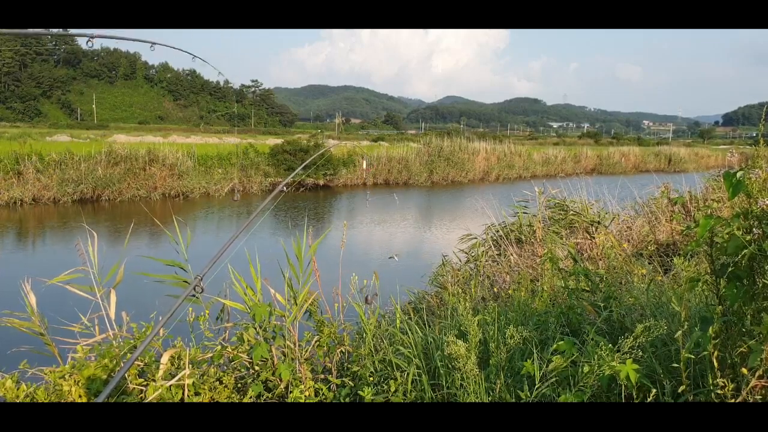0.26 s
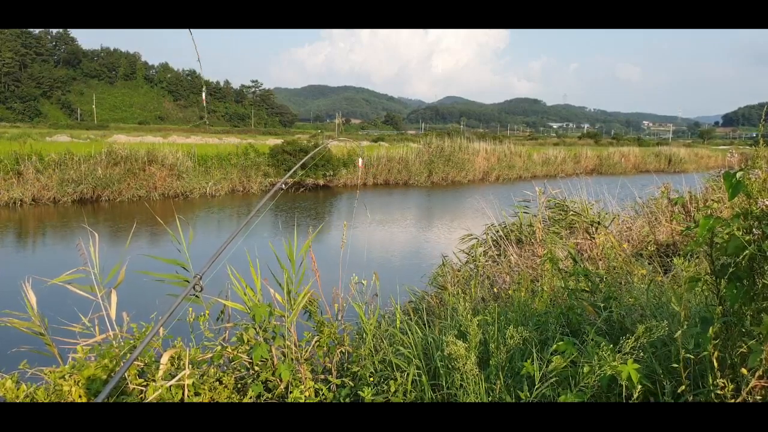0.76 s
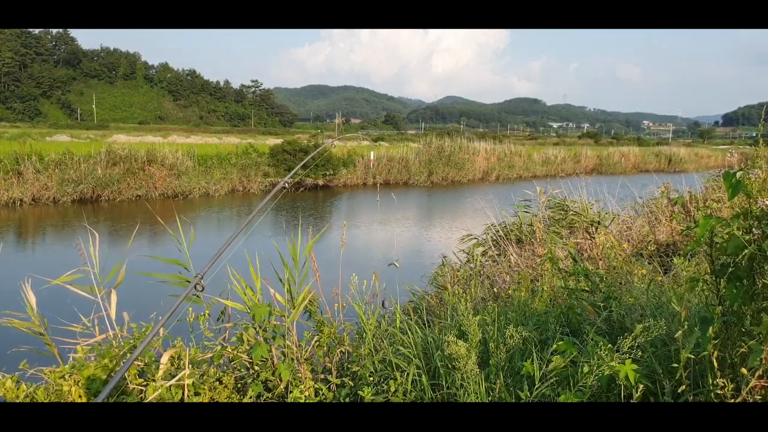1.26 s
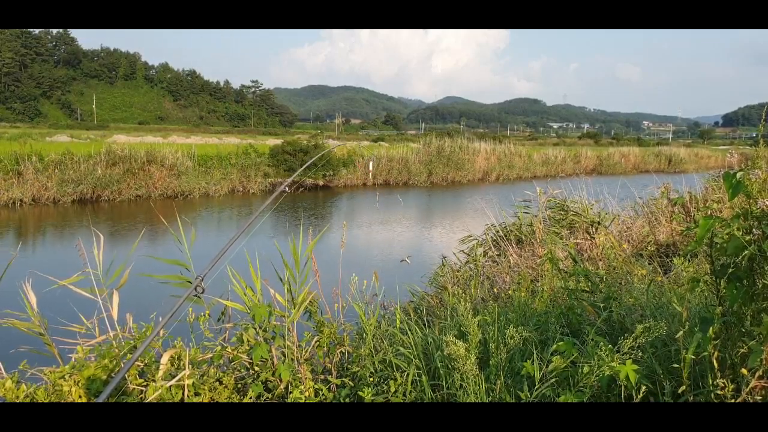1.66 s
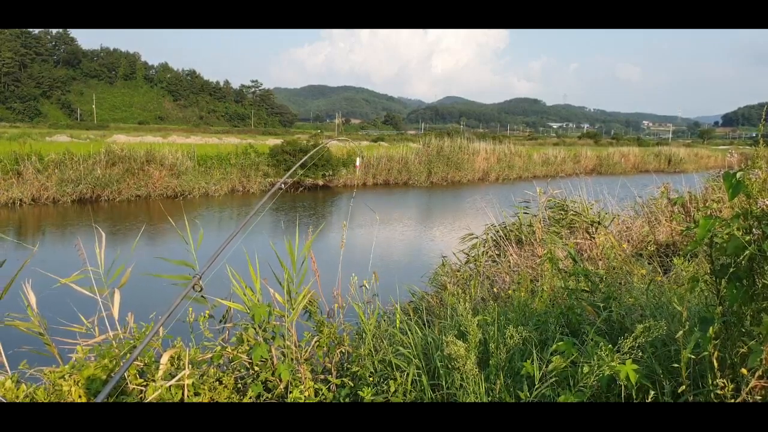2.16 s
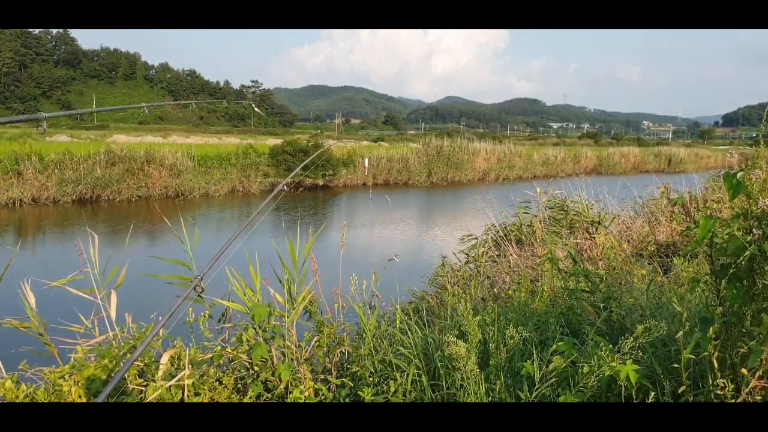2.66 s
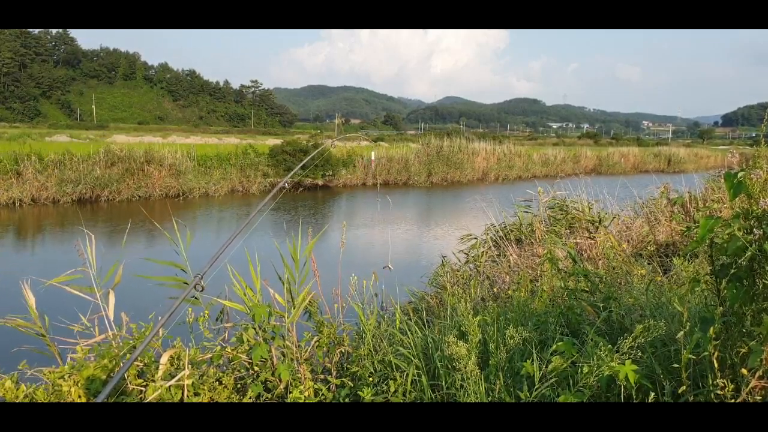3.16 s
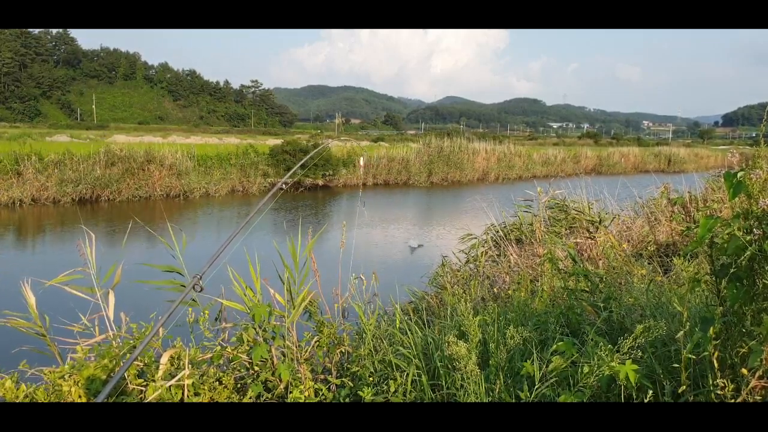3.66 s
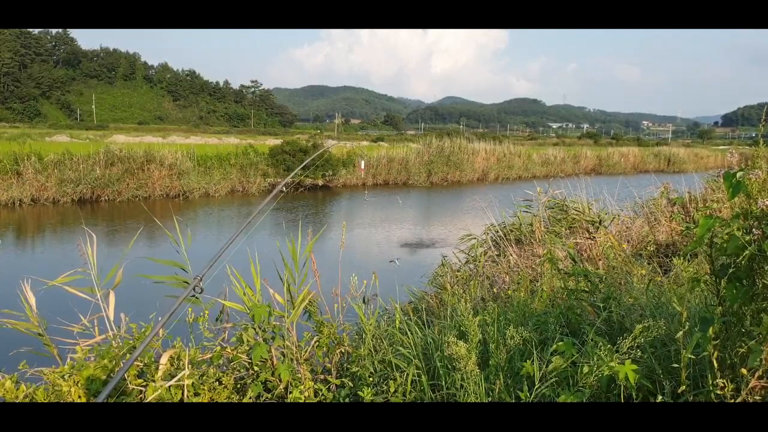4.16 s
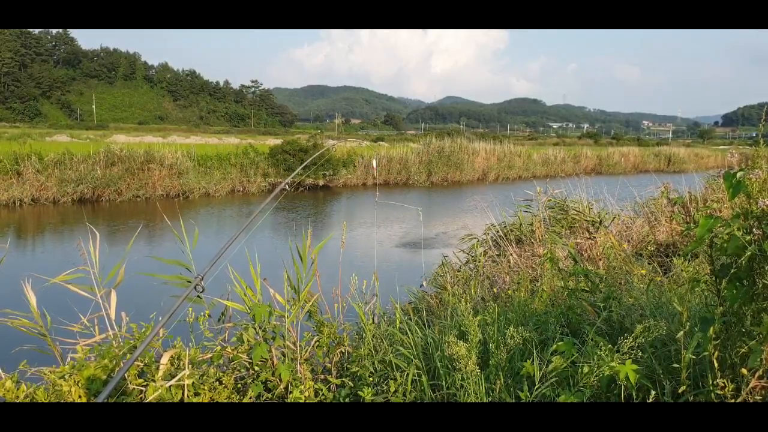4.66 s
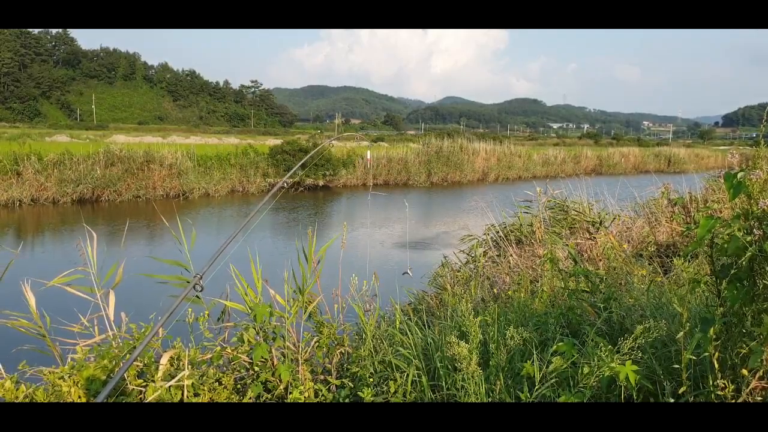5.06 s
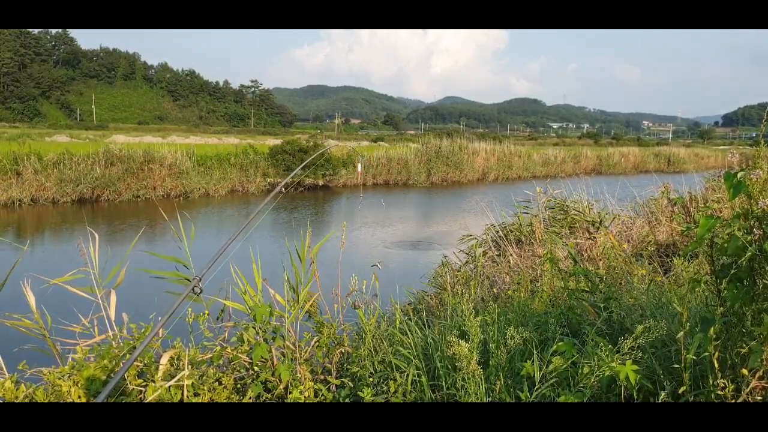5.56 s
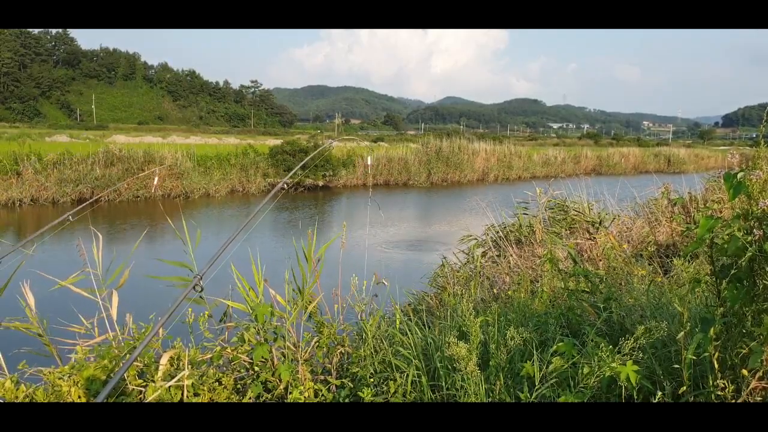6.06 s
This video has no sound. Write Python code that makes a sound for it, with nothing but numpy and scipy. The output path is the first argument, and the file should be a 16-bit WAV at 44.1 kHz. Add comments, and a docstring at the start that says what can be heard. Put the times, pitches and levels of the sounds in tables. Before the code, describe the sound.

Gusty wind rumbles on the microphone while a fishing cast whips line off a reel in rapid cracks, with insects rasping over a reedy bank.

```python
"""A reedy bank in gusty wind, heard through the two microphone ports of a phone.
Close on the left an angler casts: line whips off the spool in quick cracks over a crackling hiss.
Hands, cloth and stems rustle before and after as noise that rings the tackle; bubbles plop at the lure.
A katydid and a trilling cricket beat out rasps and tooth clicks; crickets on the right slide short notes.
Wind is uneven rumble and flutter with swinging buffets and pressure jolts; far leaves hiss behind."""
import sys
import numpy as np
from scipy import signal
from scipy.fft import rfft, irfft
from scipy.io import wavfile
from scipy.ndimage import uniform_filter1d, map_coordinates

SR = 44100
rng = np.random.default_rng(int(sys.argv[2]) if len(sys.argv) > 2 else 0)


def store_wav(level_fs):
    """Save 16-bit WAV to argv[1]."""
    pcm = np.round(np.clip(np.atleast_2d(level_fs), -1, 1) * 32767)
    wavfile.write(sys.argv[1], SR, pcm.T.astype(np.int16))


N = 278271
PORT_LAG = 19  # samples by which the right port hears the left bank later


def amp(db):
    """Decibels to a plain factor."""
    return 10 ** (np.asarray(db, float) / 20)


def pan(db):
    """Factors for the two ports, from left minus right in dB."""
    return amp([[db / 2], [-db / 2]])


def add(out, s, sound):
    """Lays a short sound into the mix at s seconds."""
    i = max(int(s * SR), 0)
    out[:, i:i + sound.shape[1]] += sound[:, :N - i]


def unit_rms(x):
    """Scales both ports together to rms 1."""
    return x / np.sqrt(np.mean(x ** 2))


def butter(x, hz, kind="low"):
    """Gentle second-order filter."""
    return signal.sosfilt(signal.butter(2, hz, kind, fs=SR, output="sos"), x)


def steep_cut(x, hz, depth_db):
    """Steep low-pass that takes the treble above hz down by depth_db or more."""
    return signal.sosfilt(signal.ellip(8, .2, depth_db, hz, fs=SR, output="sos"), x)


def colour(x, points, size=8192):
    """Causal filter through (Hz, dB) points, made from the cepstrum of the log gain; each port has rms 1."""
    hz, db = np.transpose(points)
    bins_hz = np.arange(size // 2 + 1) * SR / size
    log_gain = np.interp(np.log(bins_hz + 1), np.log(hz), db) * np.log(10) / 20
    cepstrum = irfft(log_gain)
    # folding the cepstrum forward gives minimum phase
    cepstrum[1:size // 2] *= 2
    cepstrum[size // 2 + 1:] = 0
    impulse = irfft(np.exp(rfft(cepstrum)))
    y = signal.oaconvolve(x, impulse[None], axes=1)[:, :x.shape[1]]
    return y / np.sqrt(np.mean(y ** 2, axis=1, keepdims=True))


def curve(rows, off=None):
    """Columns of a table at every sample; off is the value outside its times."""
    s, *columns = np.transpose(rows)
    return [np.interp(np.arange(N) / SR, s, c, off, off) for c in columns]


def walk(rate, channels=1):
    """Random levels held 1 / rate seconds and slewed twice."""
    k = int(SR / rate)
    held = np.repeat(rng.standard_normal((channels, N // k + 1)), k, axis=1)[:, :N]
    return 0.98 * uniform_filter1d(uniform_filter1d(held, k), k)


def ports(likeness, grain_db=0.):
    """Noise of random grain sizes at both ports: partly the same, later on the right."""
    grains = amp(grain_db * np.minimum(rng.exponential(size=N), 5.0))
    left, other = rng.standard_normal((2, N)) * grains
    right = likeness * left + np.sqrt(1 - likeness ** 2) * other
    return np.array([left, np.roll(right, PORT_LAG)])


def resonate(x, hz, width):
    """One resonance peak."""
    return signal.lfilter(*signal.iirpeak(hz, hz / width, fs=SR), x)


def ring(x, modes, patchy_db=0., rate=25.):
    """Noise through (Hz, width Hz, dB) resonances, each coming and going on its own; result has rms 1."""
    y = 0
    for hz, width, db in modes:
        level_db = db + (patchy_db * walk(rate) if patchy_db else 0)
        y = y + amp(level_db) * resonate(x, hz, width)
    return unit_rms(y)


def waver(x, share, rate):
    """Plays a sound a little faster and slower by turns, so that its resonances drift."""
    place = np.cumsum(1 + np.clip(share * walk(rate)[0], -.3, .3))
    return np.array([map_coordinates(v, [place], mode="mirror") for v in x])


def even(x, seconds):
    """Levels out the slow swells of a noise and keeps the quick ones."""
    k = int(seconds * SR)
    return x / np.sqrt(uniform_filter1d(uniform_filter1d(x ** 2, k), k) + 1e-9)


def crackle(rate, t60, spread_db, bed_db):
    """Gate of chance catches that start at once and die away over a steady bed; rms 1."""
    hit = rng.random(N) < rate / SR
    size = amp(spread_db * np.minimum(rng.exponential(size=N), 4.0))
    catches = signal.lfilter([1], [1, -amp(-60 / (t60 * SR))], hit * size)
    return unit_rms(amp(bed_db) + catches)


def swell(s, db, rise, fall):
    """A peak that grows 20 dB in rise s and fades 20 dB in fall s."""
    t = np.arange(N) / SR
    return amp(db - 20 * np.maximum((s - t) / rise, (t - s) / fall))


def burst(noise, s, t60, tail_db, rise=0.00079):
    """A stretch of noise under a quick rise, a fast fall and a faint tail, peak 1 at each port."""
    t = np.arange(4000) / SR
    i = int(s * SR / 2)  # each moment takes its own stretch
    fall = amp(-60 * t / t60) + amp(tail_db - 60 * t / (20.0 * t60))
    shape = (1 - np.exp(-t / rise)) * fall
    y = noise[:, i:i + len(t)] * np.array([shape, np.roll(shape, PORT_LAG)])
    return y / np.abs(y).max(axis=1, keepdims=True)


def slides(rows, pan_db):
    """Short near-pure notes that slide in pitch."""
    out = np.zeros((2, N))
    for s, hz0, hz1, length, db in rows:
        n = int(length * SR)
        turns = np.cumsum(np.linspace(hz0, hz1, n)) / SR
        add(out, s, amp(db) * np.hanning(n) * np.sin(2 * np.pi * turns) * pan(pan_db))
    return out


# Hiss of far leaves and reeds. Each row: frequency in Hz, gain in dB.
LEAF_TONE = [(88, -34), (150, -17), (354, -12.5), (689, -26.5), (1260, -22.5), (2310, -20.5), (3220, -19),
             (3900, -10.5), (5680, -9), (7600, -12), (9100, -15), (12400, -10.5), (14000, -17),
             (15400, -16), (16000, -13.5)]
# How loud the leaves are. Each row: time in seconds, level in dB.
LEAF_LEVEL = [(0, -51.5), (.45, -58), (.7, -59), (1.3, -55.5), (2.0, -56), (3.8, -60.5), (4.5, -61.5),
              (5.3, -60.5), (6.31, -53)]


def far_leaves():
    """Distant hiss whose low, middle and high parts waver on their own."""
    hiss = colour(ports(0.11), LEAF_TONE)
    low, high = butter(hiss, 3500), butter(hiss, 9000, "high")
    out = np.zeros((2, N))
    for part in (low, hiss - low - high, high):
        out += amp(2.0 * walk(8.1) + 0.61 * walk(10.0, channels=2)) * part
    return amp(curve(LEAF_LEVEL)[0]) * out


# Low hollow hiss. Each row: time in seconds, relative level in dB.
HOLLOW_LEVEL = [(4.75, -76), (5.106, -58), (5.75, -88)]
# Its resonances. Each row: frequency in Hz, width in Hz, relative level in dB.
HOLLOW_MODES = [(1610, 210, 3), (2400, 820, -3.5)]


def hollow_hiss():
    """Noise through two drifting resonances swells and sinks, crackling a little."""
    hollow = waver(ring(ports(0.94), HOLLOW_MODES, patchy_db=3.0), .06, 10.)
    return amp(curve(HOLLOW_LEVEL, -120.)[0] + 5.0) * crackle(400., 0.022, 2.1, -6.0) * hollow


# Crickets on the right. Each row: a note as start in Hz, end in Hz, length in seconds, seconds between
# notes; then its phrases, each with first note in seconds, end in seconds, level in dB.
CHIRPS = [((4750, 4150, 0.0214, .034), [(0, .05, -54.5), (.265, .38, -52), (3.675, 3.76, -58),
          (4.078, 4.09, -57), (6.013, 6.1, -54)]), ((4180, 3850, 0.022, .061), [(.688, .96, -68.5)]),
          ((6140, 5340, 0.0074, 0.014), [(.558, .576, -56), (.657, .675, -60), (.753, .771, -62.5),
          (3.893, 3.91, -60), (4.168, 4.186, -63), (4.26, 4.278, -60)]), ((5470, 5060, 0.011, 0.015),
          [(.28, .31, -45), (1.209, 1.25, -50), (1.259, 1.285, -58), (5.757, 5.8, -61)])]


def crickets(rasp_db=3.0, scatter_db=1.5):
    """Every cricket repeats its own sliding, slightly raspy note through each phrase."""
    notes = []
    for (hz0, hz1, length, every), phrases in CHIRPS:
        for first, end, db in phrases:
            for s in np.arange(first, end, every):
                notes.append((s, hz0, hz1, length, db + scatter_db * rng.standard_normal()))
    return amp(rasp_db * walk(900)) * slides(notes, pan_db=-20.5)


# Two trills. Each row of a trill: time in seconds, relative level in dB, wing strokes per second.
TRILLS = [
    [(1.15, -67, 70), (1.4, -56.5, 71), (1.718, -54.5, 77), (1.935, -55.5, 72)],
    [(5.6, -67, 70.0), (5.75, -61, 70.0), (5.8, -57, 70.0), (6.01, -53, 72), (6.31, -56, 64)],
]
# The ringing wing. Each row: frequency in Hz, width in Hz, relative level in dB, left minus right in dB.
WING_MODES = [(4440, 580, -2.5, 1), (9900, 2000, -8, 8), (14700, 1300, -7.5, 14)]


def trilling_cricket(teeth=(0, .00064, .00128, .00213), scatter_db=1.5, rasp_db=15):
    """Every stroke drags a few teeth (delays in s) over the wing, which rings at a pitch and its overtones."""
    clicks = np.zeros(N)
    for rows in TRILLS:
        rate = curve(rows)[1] * (1 + 0.02 * walk(60)[0])
        strokes = np.diff(np.cumsum(rate / SR) // 1, prepend=0)
        level_db = curve(rows, -120.)[0] + 35.5
        for lag in teeth:
            clicks += np.roll(strokes, int(lag * SR)) * amp(level_db + scatter_db * rng.standard_normal(N))
    # the wing also rasps for a moment at every stroke
    clicks += amp(rasp_db) * uniform_filter1d(clicks, 220) * rng.standard_normal(N)
    wing = np.zeros((2, N))
    for hz, width, db, pan_db in WING_MODES:
        tone = resonate(resonate(clicks, hz, 2 * width), hz, width)
        wing += amp(db - 3.0) * pan(pan_db) * tone
    return np.array([wing[0], np.roll(wing[1], PORT_LAG)])


# Bouts of evenly spaced katydid phrases. Each row: first phrase in seconds, end in seconds,
# seconds between phrases, level in dB at first, level in dB at the end.
KATYDID_BOUTS = [(.04, 2.2, .2075, -47, -47), (3.807, 5.7, .2035, -53, -51), (5.844, 6.4, .2235, -48, -47)]
# Rasp of the wing. Each row: frequency in Hz, gain in dB.
KATYDID_TONE = [(8500, -40), (10300, 1), (11500, 2), (12600, 11.5), (13600, 0), (15200, -1), (16000, -48)]


def katydid(gap=0.0157, stroke=0.0054, growth_db=1.5, scatter_db=3.0, pan_db=9.5, count=5):
    """Each wing stroke on the left is a short rasp; five strokes, tending to grow, make a phrase."""
    gate, t = np.zeros(N), np.arange(N) / SR
    for first, end, every, db0, db1 in KATYDID_BOUTS:
        for s in np.arange(first, end, every):
            near = slice(max(int((s - .12) * SR), 0), int((s + .03) * SR))
            phrase_db = np.interp(s, [first, end], [db0, db1])
            for k in range(count):  # counted back from the last stroke; they tend to grow toward it
                db = phrase_db - growth_db * k + scatter_db * rng.standard_normal()
                gate[near] += amp(db) * np.exp(-.5 * ((t[near] - s + gap * k) / stroke) ** 2)
    return gate * amp([[0], [-pan_db]]) * colour(ports(0.17), KATYDID_TONE)


# Single buffets that stand out. Each row: time in seconds, relative level in dB,
# left minus right in dB, flutter against rumble in dB.
BUFFETS = [(0.124, -31.5, -1, -16), (0.428, -54, 17.5, -31), (0.51, -40.5, -28, -25),
           (0.632, -36.5, 17, -9.5), (0.747, -37.5, 21, -28), (0.854, -26.5, -14, -10.5),
           (1.076, -33, 14, -17), (1.308, -46, 15, -35), (1.39, -29.5, 32, -3), (1.519, -37, 0, -20),
           (1.612, -31.5, 28, -17), (1.683, -32, -3, -11), (1.792, -28, 4, -10.5), (1.955, -35.5, 0.5, -19),
           (2.166, -27, 17, -9), (2.301, -28.5, 31, -11), (2.399, -31.5, 23, -6), (2.544, -36, 29, -26),
           (2.807, -34.5, 3.5, -11), (2.887, -34, -7, -9.5), (2.972, -27.5, 37, -1.5),
           (3.113, -23, 31, -12), (3.233, -23.5, 23, -10), (3.424, -34.5, 26, -8.5),
           (3.477, -31.5, 20, -19), (3.651, -38, 20, -25), (4.023, -36, 27, -12.5), (4.355, -35, -9, -16),
           (4.405, -25, 33, -10.5), (4.496, -25.5, 22, -13), (4.721, -38.5, 19, -27), (4.86, -36.5, 43, 3),
           (4.962, -37.5, -25, -12), (5.016, -37, -19, -25), (5.126, -32.5, 24.5, -20),
           (5.201, -31.5, 22, -18), (5.348, -27, 17, -10), (5.571, -37.5, 10, -35), (5.61, -26, 7, -19),
           (5.645, -23.5, 23, -8), (5.723, -28.5, -1, 0), (5.745, -23, 3, -8), (5.785, -26, 7, -1.5),
           (5.837, -26.5, -26, -15), (5.885, -31, 2, -9), (5.921, -28, 3, -6), (5.953, -24, -19, -25),
           (6.018, -26, 3.5, -12), (6.066, -17, 14, -8.5), (6.15, -25, 11, 1.5), (6.191, -20, 13, -1.5),
           (6.265, -20, -1, -10)]
BUFFET_RISE_S, BUFFET_FALL_S = 0.013, 0.019
# centre pitch of a buffet's swing and of its sharp front; both scatter and sink by the sag share
BUFFET_HZ, FLAP_HZ, BUFFET_SAG = 61.8, 125.8, 0.28


def buffets():
    """Each buffet swings a few times, sinking; also returns the flutter it stirs up at the ports."""
    t, thumps, stirred = np.arange(N) / SR, np.zeros((2, N)), np.zeros((2, N))
    for s, db, pan_db, flap_db in BUFFETS:
        pitch, phase = rng.random(), rng.random((2, 1))  # each port swings on its own
        near = slice(max(int((s - .2) * SR), 0), int((s + .3) * SR))
        since = t[near] - s
        shape = np.exp(-.5 * (since / np.where(since < 0, BUFFET_RISE_S, BUFFET_FALL_S)) ** 2)
        push = amp(db) * shape * amp(np.minimum([[pan_db], [-pan_db]], 0))
        swing = (0.85 + 0.3 * pitch) * since * (1 - BUFFET_SAG * np.tanh(since / 0.039))
        body = np.sin(2 * np.pi * (BUFFET_HZ * swing + phase))
        front = amp(flap_db) * shape * np.sin(2 * np.pi * (FLAP_HZ * swing + phase))
        thumps[:, near] += amp(1.5) * push * (body + front)
        stirred[:, near] += amp(flap_db - 6.5) * push
    return thumps, stirred


# Wind on the ports between buffets. Each row: time in seconds, rumble left in dB, rumble right in dB,
# flutter against rumble in dB.
GUSTS = [(0, -38.5, -40, -13), (.35, -49.5, -54.5, -32), (.7, -44, -51.5, -30), (1.15, -43, -59, -27.5),
         (1.6, -36.5, -39, -22), (2.05, -47.5, -47, -30), (2.5, -46, -64.5, -14), (2.8, -46.5, -46.5, -19),
         (3.3, -44, -48, -7), (3.6, -47.5, -56, 0), (3.9, -56.5, -76, -42), (4.4, -37, -41, -18.5),
         (4.8, -45, -63, -23), (5.05, -42.5, -54, -19.5), (5.5, -41, -35, -23), (5.7, -27.5, -32.5, -22),
         (5.9, -37.5, -30.5, -26), (5.965, -37, -26.5, -23), (5.99, -55, -54, -30), (6.02, -28, -33, -20),
         (6.1, -27, -30, -16.5), (6.31, -27.5, -27.5, -15)]
# Tone of the rumble, of the flutter and of air past the port edges. Each row: frequency in Hz, gain in dB.
RUMBLE_TONE = [(12, -40.5), (25, -22), (40, -6), (55, -1), (80, -5.5), (110, -11), (160, -29), (260, -43),
               (500, -85.5)]
FLUTTER_TONE = [(70, -23.5), (120, -5.5), (170, -6.5), (250, -18), (400, -43.5), (800, -54)]
EDGE_TONE = [(120, -26.5), (250, -0.5), (450, -5), (750, -10.5), (1000, -28), (1500, -37)]
PORT_LOW_HZ = 33.7  # the ports lose the deepest pressure swings


def wind(buffet_db=6.0, flutter_db=6.5, waver_db=3.0):
    """Eddies push each port on its own; the sharper ones flutter higher, and buffets thump on top."""
    left_db, right_db, over_db = curve(GUSTS)
    thumps, stirred = buffets()
    push = amp([left_db, right_db] + waver_db * walk(12, channels=2))
    flap = push * amp(over_db) + stirred
    eddies, sharp = walk(35, channels=2), walk(60, channels=2)
    rumble = colour(rng.standard_normal((2, N)) * amp(buffet_db * eddies), RUMBLE_TONE)
    flutter_level = amp(flutter_db * (1.28 * eddies + 2.63 * sharp))
    flutter = colour(rng.standard_normal((2, N)) * flutter_level, FLUTTER_TONE)
    edge = colour(rng.standard_normal((2, N)) * amp(3.9 * sharp), EDGE_TONE)
    # air past the port edges grows more slowly with the gust
    edge *= np.sqrt(flap) * amp(-35.5)
    gusts = push * even(rumble, 0.043) + flap * even(flutter, 0.087) + edge + thumps
    return butter(gusts, PORT_LOW_HZ, "high")


# Pressure steps on the left port. Each row: time in seconds, level in dB.
JOLTS = [(2.3875, -11.5), (2.4692, -30.5), (2.4998, -30), (2.9592, -14.5), (3.1, -13.5), (3.1571, -28.5),
         (3.1722, -25), (3.3205, -26), (3.3857, -28)]


def jolts(ring_hz=65.0, t60=0.068, lead=0.96, spike_s=.0008):
    """A sudden step of pressure drops back at once and swings under zero."""
    out, t = np.zeros((2, N)), np.arange(6000) / SR
    spike = 0.47 * np.exp(-t / spike_s)
    swing = np.exp(-t * np.log(1000) / t60) * np.cos(2 * np.pi * ring_hz * t + lead)
    for s, db in JOLTS:
        add(out, s, amp(db) * (spike + swing) * [[1], [0]])
    return out


# Bubbles. Each row: start in seconds, first pitch in Hz, last pitch in Hz, length in seconds, level in dB.
PLOPS = [(3.545, 180, 310, 0.032, -37.5), (3.572, 243, 344, 0.028, -43), (3.56, 850, 1100, 0.02, -49.5),
         (3.59, 417, 550, 0.026, -50.5)]


def plops():
    """Bubbles as the lure meets the water: short unsteady notes that slide upward."""
    return amp(3.5 * walk(200)) * slides(PLOPS, pan_db=-1.5)


# What rod and reel ring with when rubbed or knocked. Each row: frequency in Hz, width in Hz,
# relative level in dB.
TACKLE = [(1664, 230, -13), (1960, 106, -8.5), (2350, 160, -9), (2780, 104, -1.5), (3610, 230, -1.5),
          (4890, 320, -12), (5540, 910, -5), (6860, 180, -9.5), (7510, 200, -10)]
# Hands, cloth and stems rubbing. Each row: peak in seconds, relative level in dB, seconds to fade 20 dB,
# ring in Hz. A negative fade turns the rub round: a slow swell and a quick end.
RUBS = [(.02, -48, 0.09, 2310), (.12, -55, 0.19, 1530), (.27, -53, .1, 3700), (0.296, -45.5, 0.17, 2090),
        (.375, -51, 0.11, 2700), (.47, -63, 0.3, 2260), (1.0, -62, 0.17, 2380), (1.269, -51, 0.21, 2900),
        (1.335, -64, -0.06, 3600), (1.36, -52.5, 0.14, 2600), (1.375, -56, 0.08, 750),
        (1.428, -49, 0.14, 950), (1.46, -49.5, 0.1, 2700), (1.725, -50, 0.13, 2200),
        (3.458, -39, -0.02, 2900), (3.478, -38, 0.163, 2480), (3.56, -48, 0.21, 1920),
        (3.63, -62, 0.35, 2880), (3.94, -53.5, 0.25, 2790), (4.02, -53, 0.04, 1900),
        (4.05, -52.5, 0.26, 2810), (4.27, -62, 0.46, 1760), (4.44, -47, 0.05, 2250),
        (4.549, -47, 0.1, 2000), (4.655, -55.5, 0.1, 2600), (5.05, -53.5, 0.56, 2280),
        (5.33, -52, -0.1, 2400), (6.168, -41, 0.04, 2160)]
# Tone of the rubbing. Each row: frequency in Hz, gain in dB.
RUSTLE_TONE = [(290, -32.5), (500, -11), (761, -4), (1840, 0), (2010, -4.5), (3110, 1), (5240, -2.5),
               (9490, -12.5), (11500, -4), (15300, -5), (16000, -28)]
RUB_RISE_SHARE = 0.33  # a rub swells in this share of its fading time
RUB_WIDTH_HZ, RUB_RING_DB = 200, -6.5


def rubs():
    """Dense small scrapes that ring the tackle; every rub also has a ring of its own."""
    scrapes = ports(0.3, grain_db=2.0)
    rings = waver(ring(scrapes, TACKLE, patchy_db=6.0), .05, 8.)
    grit = crackle(500.0, 0.013, 3.2, -29.0) * colour(scrapes, RUSTLE_TONE)
    rustle = amp(-5.0) * grit + amp(-7.0) * rings
    rough = ports(0.73) * amp(6.8 * walk(60))
    out = np.zeros((2, N))
    for s, db, fade, hz in RUBS:
        own_ring = amp(RUB_RING_DB) * ring(rough, [(hz, RUB_WIDTH_HZ, 0)])
        out += swell(s, db, RUB_RISE_SHARE * fade, fade) * (rustle + own_ring)
    return out


# Snaps of stems and tackle. Each row: time in seconds, relative level in dB,
# bright edge against body in dB, ring in seconds.
SNAPS = [(0.1057, -35, 7.5, 0.027), (0.1115, -38.5, 0, 0.027), (0.134, -48, 13, 0.021),
         (0.141, -50, 18.5, 0.028), (0.284, -40, -10, 0.041), (0.2958, -32, 13.5, 0.021),
         (0.301, -35, -18, 0.028), (0.385, -35.5, -2, 0.047), (0.48, -45.5, -12, 0.052),
         (0.905, -52.5, 12, 0.032), (1.246, -48, -20, 0.05), (1.332, -46, -14, 0.04),
         (1.353, -33, -24, 0.028), (1.7162, -32.5, -2, 0.082), (3.618, -28, -11, 0.049),
         (4.0471, -41, -9, 0.064), (4.4311, -43, -16, 0.085), (4.439, -39.5, -18, 0.032),
         (4.539, -44.5, -6, 0.035), (4.5716, -41.5, -13, 0.19), (4.6696, -47, -21, 0.025),
         (4.71, -38.5, -22, 0.054), (4.827, -46.5, 3, 0.056), (4.886, -56, 8, 0.02),
         (4.931, -52.5, 8, 0.017), (4.953, -54, 6, 0.02), (5.028, -33.5, -5, 0.066),
         (5.1529, -37, 2.5, 0.1), (5.3378, -37, -15, 0.045), (5.449, -49.5, 10, 0.018),
         (5.51, -47.5, -10, 0.033), (5.76, -49.5, 0, 0.046), (5.954, -53.5, 5, .02),
         (6.108, -45.5, 5, 0.043), (6.159, -36, 5.5, 0.043)]
# Tone of the bright edge. Each row: frequency in Hz, gain in dB.
SNAP_EDGE = [(7000, -35), (9000, -6), (11500, 7), (13500, -2), (15500, -5), (16200, -43)]


def snaps():
    """A blow is a short tick, a longer ring of the tackle and a brief bright edge."""
    out, blows = np.zeros((2, N)), ports(0.71)
    body = waver(ring(blows, TACKLE, patchy_db=6.0), .07, 30.) + amp(-6.0) * colour(blows, RUSTLE_TONE)
    bright = colour(blows, SNAP_EDGE)
    for s, db, edge_db, t60 in SNAPS:
        tick = burst(body, s, .005, -40)
        tail = 1.64 * burst(body, s, t60, -25.0)
        edge = amp(edge_db) * burst(bright, s, max(0.13 * t60, .002), -36)
        add(out, s, amp(db) * (tick + tail + edge))
    return out


# The ringing spool lip. Each row: frequency in Hz, width in Hz, relative level in dB.
LIP = [(13040, 230, 0)]
# The lip rings more as the line runs low. Each row: time in seconds, ring against crack in dB.
LIP_RING = [(2.1, -26), (3.12, -10.5), (3.17, -4), (3.4, -1)]
# Line running through the guides. Each row: time in seconds, level in dB.
RUN = [(2.1, -50), (2.108, -38), (2.15, -40), (2.25, -44), (2.296, -40.5), (2.4, -37), (2.46, -37),
       (2.51, -44), (2.56, -45.5), (2.69, -43), (2.75, -46.5), (2.79, -45), (2.85, -44), (2.93, -42.5),
       (3.036, -40), (3.13, -40.5), (3.2, -42.5), (3.3, -43), (3.36, -42), (3.45, -40), (3.7, -75)]
# Hiss of the line. Each row: frequency in Hz, gain in dB.
RUN_HISS = [(290, -74), (500, -32), (1150, -17), (2610, -12.5), (3300, -18.5), (3800, -11), (4400, -12),
            (5670, -6.5), (7270, -5), (8300, -17), (12500, -6.5), (14500, -13), (15600, -14), (16500, -18)]
# The rod guides sing as line rubs them. Each row: frequency in Hz, width in Hz, relative level in dB.
GUIDES = [(7530, 180, 9.5), (4530, 330, -17), (2700, 150, -3), (1940, 120, -4.5)]


def running_line():
    """Line hisses and crackles through the guides, which sing, and the spool lip rings along."""
    line = ports(0.46, grain_db=2.0)
    whole = colour(line, RUN_HISS)
    low = butter(whole, 3300)
    hiss = crackle(450., 0.016, 2.5, -21.0) * (whole - low)
    hiss += crackle(150., 0.031, 4.2, -20.0) * low
    hiss += amp(-6.5) * ring(ports(0.28), GUIDES, patchy_db=8.0, rate=40.)
    # the lip's growth in dB is halved here
    hiss += amp(curve(LIP_RING)[0] / 2) * ring(line, LIP, patchy_db=6.5)
    return amp(curve(RUN, -120.)[0]) * pan(0.74) * hiss


# Line slapping the spool lip. Each row: time in seconds, relative level in dB,
# left minus right in dB, dull part against bright in dB.
TICKS = [(2.1451, -13, 1, -7), (2.1624, -15, 3, -8), (2.177, -7, 6, -8), (2.193, -18, -6, -2),
         (2.2122, -13, 5, -8.5), (2.2347, -4, 2, -8), (2.2748, -20, 7, -11), (2.278, -18, 8, -8),
         (2.3308, -22, 14, -5), (2.3443, -27, 13, -7), (2.359, -26, 7, -3), (2.373, -12.5, 14, -16),
         (2.387, -9, 11, -9), (2.397, -22, 5, -4), (2.4125, -16, 9, -3), (2.4285, -13, 18, -5),
         (2.446, -18, 8, -8), (2.4692, -10.5, 14, -10), (2.5003, -9.5, 7, -16), (2.5088, -22, 15, -4.5),
         (2.5115, -22, 15, -8), (2.5717, -15, 10, -10.5), (2.5895, -30, 1, -5), (2.6039, -20.5, 8, -5),
         (2.6195, -15.5, 8, -12), (2.6365, -25, 10, -11), (2.6542, -11, 8, -7), (2.6699, -14.5, 5, -9),
         (2.6888, -16, 9, -10), (2.7065, -25.5, -1, 0), (2.7255, -24, 7, -11), (2.7575, -11.5, 12, -13),
         (2.7741, -21, 3, -1), (2.778, -15.5, 4, -7), (2.809, -24, 8.5, -6), (2.8263, -10, 8, -9),
         (2.8574, -21.5, 10, -14), (2.875, -9, 12, -6.5), (2.8917, -16, 12, -15), (2.9089, -13.5, 8, -9.5),
         (2.922, -24, 10, -6), (2.9586, -10.5, 11, -13), (2.975, -17, 12, -17), (2.9913, -9.5, 6, -7.5),
         (3.0077, -15, 10, -8), (3.0265, -7.5, 10, -10.5), (3.037, -24, 7, -5), (3.0414, -17, 18, -13),
         (3.0587, -12.5, 10, -7), (3.0712, -15, 13, -5.5), (3.0853, -21, 11, -5), (3.099, -13.5, 8, -8.5),
         (3.117, -19, 12, -13), (3.145, -19, 13, -11), (3.157, -12.5, 10, -11.5), (3.1718, -8, 14, -7.5),
         (3.1857, -30, 10, -5), (3.2094, -34, 15, -15), (3.2269, -16.5, 15, -5.5), (3.2403, -21, 9, -7),
         (3.2516, -15.5, 16, -8), (3.2813, -27, 15, -14), (3.3211, -8, 14, -4.5), (3.3268, -22, 7, -2),
         (3.3343, -18, 11, -10), (3.349, -13.5, 14, -15), (3.362, -22, 12, -14), (3.3851, -16, 13, -6),
         (3.399, -20.5, 8, -13)]
# Tone of the bright and of the dull part. Each row: frequency in Hz, gain in dB.
TICK_BRIGHT = [(7000, -37), (9000, -12.5), (12000, 0.5), (15000, 3.5), (15600, -8), (16400, -24),
               (17000, -33)]
TICK_DULL = [(700, -23), (2000, -15), (3300, -20), (4600, 2.5), (5800, 1.5), (7300, 0), (8500, -2),
             (10500, -14.5)]


def spool_cracks():
    """Each coil slaps the lip with a bright crack, a dull knock and a ring of the lip."""
    out = np.zeros((2, N))
    bright, dull = colour(ports(0.096), TICK_BRIGHT), colour(ports(0.54), TICK_DULL)
    lip = ring(ports(0.2), LIP)
    for s, db, pan_db, dull_db in TICKS:
        lip_db = np.interp(s, *np.transpose(LIP_RING))
        crack = burst(bright, s, .003, -26, rise=.00015)
        crack += amp(lip_db) * burst(lip, s, .012, -34)
        knock = amp(dull_db) * burst(dull, s, .004, -25, rise=.0002)
        # the phone shades the far port more in the treble
        shaded = crack * amp([[0], [-pan_db]]) + knock * amp([[0], [-.4 * pan_db]])
        add(out, s, amp(db) * 2 / (1 + amp(-pan_db)) * shaded)
    return out


def scene():
    """Wind and one cast by the reeds; only wind, jolts and the close cracks escape the treble cut."""
    soft = far_leaves() + hollow_hiss() + crickets() + trilling_cricket() + katydid()
    soft += plops() + rubs() + snaps() + running_line()
    return steep_cut(soft, 15600, depth_db=60) + wind() + jolts() + spool_cracks()


def record(dry):
    """The recorder rounds the very highest peaks toward 0.8 and cuts the top above 17 kHz."""
    rounded = .8 * dry / (.8 ** 4 + dry ** 4) ** .25
    return steep_cut(rounded, 17000, depth_db=70)


dry = scene()
out = record(dry)
store_wav(out)
```